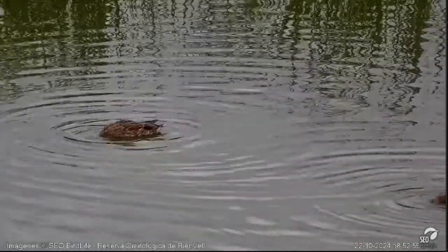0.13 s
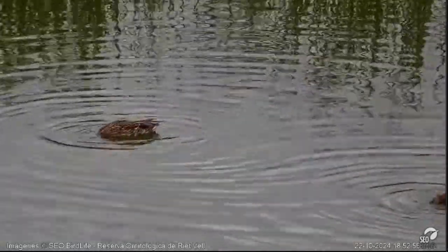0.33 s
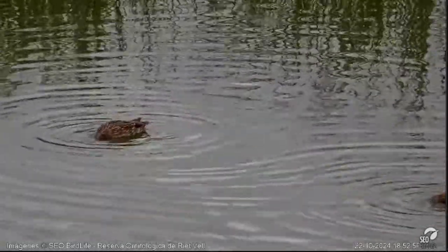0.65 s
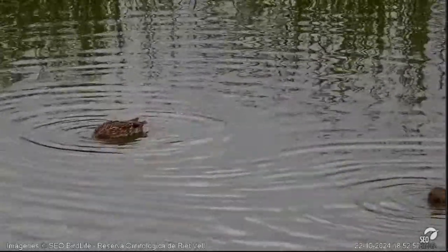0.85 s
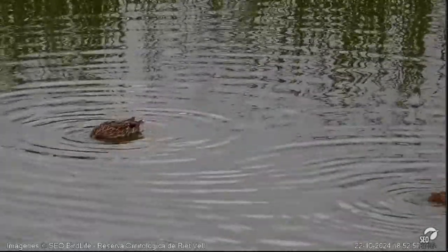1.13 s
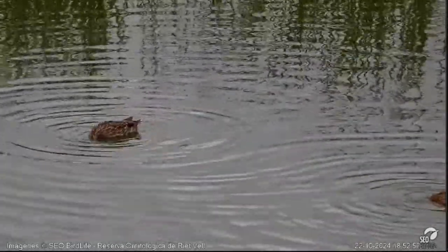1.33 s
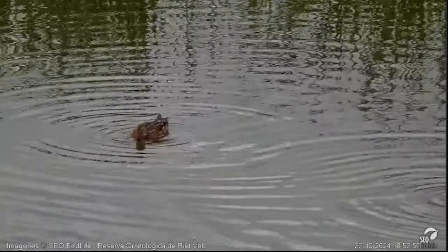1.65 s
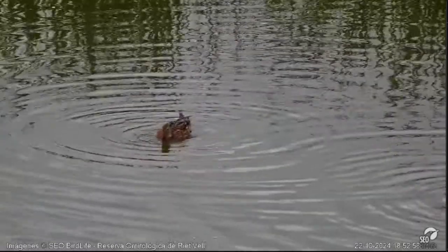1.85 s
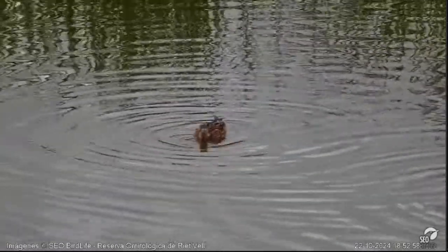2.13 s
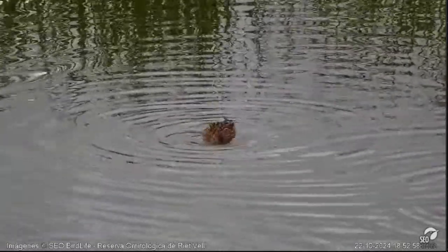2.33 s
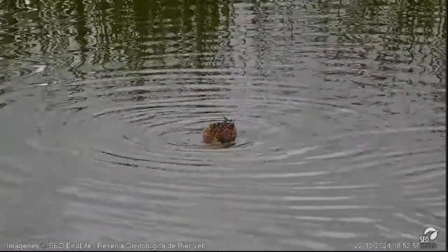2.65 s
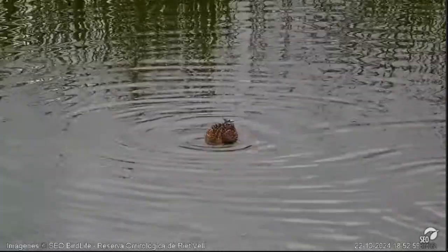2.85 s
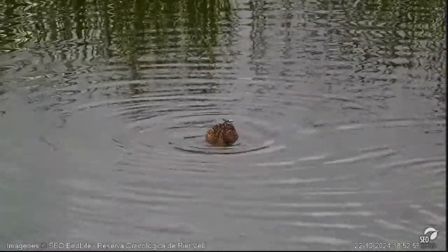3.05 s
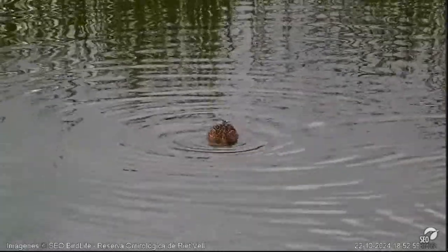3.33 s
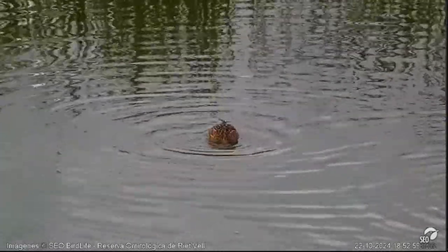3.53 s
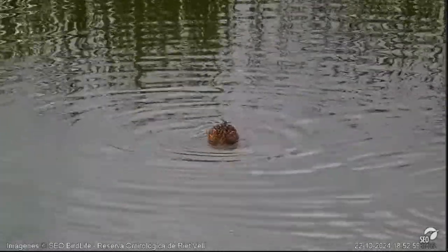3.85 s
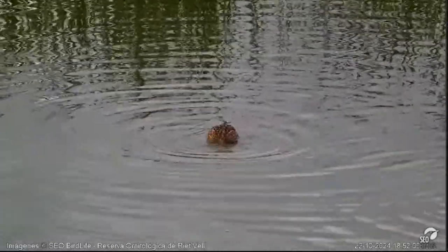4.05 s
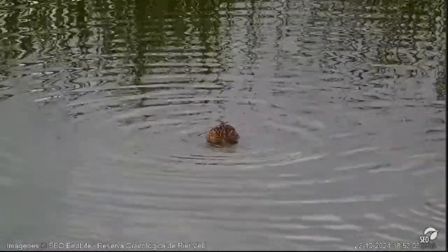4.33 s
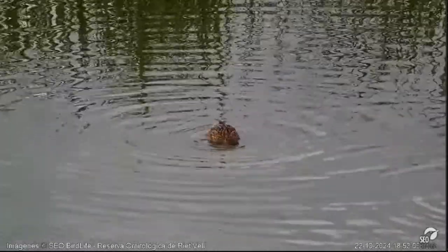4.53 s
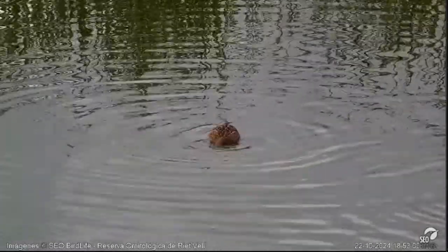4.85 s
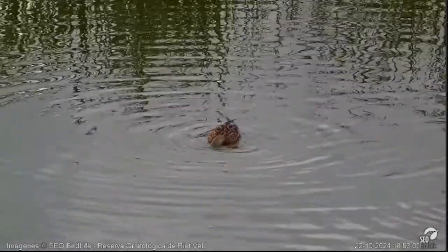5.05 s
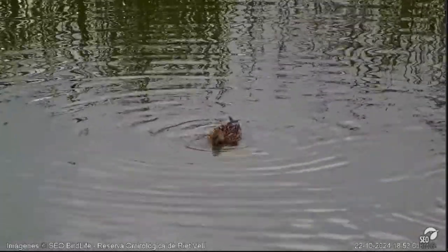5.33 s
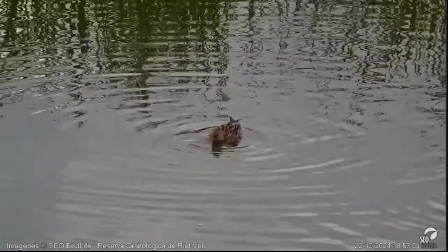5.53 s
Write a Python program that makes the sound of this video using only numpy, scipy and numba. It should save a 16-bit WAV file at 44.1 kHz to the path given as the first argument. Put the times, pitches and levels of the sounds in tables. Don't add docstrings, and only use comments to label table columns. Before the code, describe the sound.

Gusty lagoon ambience with thumping wind, throbbing insects, short bird whistles, distant duck cackles, a moment of silence, then a rough honk and grunt.

```python
import sys
import numpy as np
from scipy import signal
from scipy.fft import rfft, irfft
from scipy.io import wavfile
from scipy.ndimage import uniform_filter1d
from numba import njit

SR = 44100
rng = np.random.default_rng(int(sys.argv[2]) if len(sys.argv) > 2 else 0)


def transcribe(u):
    v = np.clip(np.atleast_2d(u).T, -1, 1)
    q = np.round(v * 32767).astype(np.int16)
    wavfile.write(sys.argv[1], SR, q)


def nominal_scale(level):
    x = np.asarray(level, float) / 20
    return 10 ** x


N = 251370
T = np.arange(N) / SR


def level(x, db):
    return x * nominal_scale(db) / np.sqrt(np.mean(x ** 2))


def track(tables):
    s, *columns = np.concatenate(tables).T
    return [np.interp(T, s, c) for c in columns]


@njit
def svf(x, hz, width):
    y, b, l = np.empty(len(x)), 0., 0.
    for i in range(len(x)):
        g, k = np.tan(np.pi * hz[i] / SR), width / hz[i]
        v = (b + g * (x[i] - l)) / (1 + g * (g + k))
        b, l, y[i] = 2 * v - b, l + 2 * g * v, k * v
    return y


def svf_twice(x, hz, width):
    return svf(svf(x, hz, width), hz, width)


def band(hz, width):
    centre = np.full(N, 1. * hz)
    return level(svf_twice(rng.standard_normal(N), centre, 1. * width), 0)


def walk(rate):
    k = int(SR / rate)
    steps = np.repeat(rng.standard_normal(N // k + 1), k)
    return 1.3 * uniform_filter1d(uniform_filter1d(steps, k), k)[:N]


def add(out, s, x):
    i = int(s * SR)
    out[max(i, 0):i + len(x)] += x[max(-i, 0):N - i]


def filtered(x, order, hz, kind="low"):
    return signal.sosfilt(signal.butter(order, hz, kind, fs=SR, output="sos"), x)


# time in seconds, level in dB.
GUST = [
    [(0.0, -41), (.3, -43), (0.6, -45), (1.15, -40), (1.45, -34.5), (1.7, -38.5), (2.0, -40.5),
     (2.35, -42.5), (2.55, -48)],
    [(2.88, -46.5), (3.07, -36.5), (3.31, -36), (3.55, -41.5), (4.04, -44.5), (4.4, -44.5), (4.9, -43.5),
     (5.42, -43.5), (5.7, -44)],
]


def wind():
    calm_db, calm_span_db, rumble_hz = -40, 9, 131.5
    gust_db = track(GUST)[0]
    eddies = filtered(rng.standard_normal(N), 3, 300.)
    out = eddies * nominal_scale(gust_db + 22.5 + 3.28 * walk(40))
    t = np.arange(-2000, 2000) / SR
    for (s, db, hz, length_s), turn in zip(buffets(), rng.random(N)):
        shape = np.exp(-(t / (0.67 * max(length_s, .003))) ** 2)
        shove = 1.6 * np.cos(2 * np.pi * turn)
        ring = np.sin(2 * np.pi * (hz * t + turn))
        add(out, s + t[0] - .004, nominal_scale(db) * shape * (ring + shove))
    rumble = filtered(out, 1, rumble_hz)
    return out - np.clip((calm_db - gust_db) / calm_span_db, 0, 1) * rumble


# time in seconds, peak in dB, ring in Hz, length in seconds.
BUFFETS = [(.008, -22.5, 236, 0.0047), (.403, -21, 232, 0.0025), (.6, -23, 287, 0.0067),
           (.707, -20.5, 210, 0.0074), (.747, -25, 242, 0.0077), (.984, -23.5, 223, 0.0051),
           (1.045, -20, 208, 0.0026), (1.236, -15, 243, 0.0056), (1.266, -9, 249.7, 0.012),
           (1.313, -15.5, 198, 0.0033), (1.343, -18, 200, 0.0084), (1.628, -24, 195, 0.0031),
           (1.832, -22, 214, 0.015), (2.143, -23, 204, 0.017), (2.172, -18, 222, 0.0041),
           (2.194, -19, 219, 0.012), (2.271, -20, 194, 0.0051), (3.13, -21.5, 226.3, 0.0037),
           (3.154, -13.5, 226, 0.004), (3.169, -18, 196, 0.0075), (3.214, -15.5, 216, 0.018),
           (3.266, -20, 228, 0.011), (3.305, -8, 164, 0.0051), (3.378, -13, 215, 0.0058),
           (3.398, -17.5, 228, 0.0056), (3.491, -22.5, 212, 0.024), (3.526, -16.5, 150, 0.0074),
           (4.623, -21.5, 242, 0.0089), (4.837, -21, 232, 0.0081), (5.13, -23.5, 205.8, 0.019)]
# time in seconds, peak in dB, ring in Hz.
PUFFS = [(0.063, -31, 303), (.363, -28.5, 277), (.767, -27, 273), (1.023, -29, 270), (1.2, -28, 250),
         (1.22, -24, 283), (1.381, -25, 190), (1.462, -34, 219), (1.494, -23, 217), (1.557, -26, 274),
         (1.811, -26, 208), (1.934, -24, 269), (1.965, -27.5, 260), (2.228, -27, 194), (2.316, -27, 217),
         (3.005, -29, 215), (3.076, -28, 332), (3.35, -22, 195), (3.427, -19, 208), (3.467, -13.5, 174),
         (3.511, -21.5, 215), (3.647, -23, 156), (3.827, -19.5, 206), (3.872, -24, 282),
         (3.913, -25.5, 286), (2.444, -27.5, 206), (2.49, -29, 192), (2.528, -28, 194.5), (1.759, -26, 171),
         (3.736, -28, 195), (4.168, -27, 201), (4.2, -30, 190), (4.221, -26.5, 247), (4.244, -30, 202),
         (4.279, -29.5, 237), (4.322, -27.5, 255), (4.371, -26, 303), (4.399, -29.5, 320),
         (4.815, -23.5, 317), (5.406, -25, 240), (4.899, -28, 211), (4.92, -28, 204), (5.06, -27, 207),
         (5.26, -33.5, 235), (5.3, -28, 243), (5.335, -32, 230), (5.43, -28, 232), (5.49, -30, 258)]


def buffets():
    puff_s, gap_s, over_gust_db, scatter_db = 0.0094, .045, 7.5, 2
    typical_hz, typical_s = 242, 0.01
    s = np.arange(0, T[-1], gap_s)
    late, size, pitch, length = rng.standard_normal((len(s), 4)).T
    s = np.clip(s + .4 * gap_s * late, 0, T[-1])
    db = np.interp(s, T, track(GUST)[0]) + over_gust_db + scatter_db * size
    chance = zip(s, db, typical_hz * (1 + .15 * pitch), typical_s * np.exp(0.69 * length))
    return BUFFETS + [(*row, puff_s) for row in PUFFS] + list(chance)


# frequency in Hz, level in dB per Hz.
SHORE = [(300, -7.5), (450, -5.5), (620, -21.5), (860, -11.5), (1400, -25.5), (1750, -18.5), (2100, -26),
         (2450, -27.5), (3200, -24), (4400, -28.5), (5600, -27.5), (7200, -39.5), (7800, -40)]
# time in seconds, level in dB.
SWELL = [
    [(0, 5), (1.0, 9.5), (1.6, 7), (2.5, 5.5), (3.4, 4.5), (3.6, 2), (4.0, 7.5), (4.6, 2), (5.7, 6)],
]


def shore():
    treble_share, treble_db = -0.7, 8
    out, (middle_db,) = 0, track(SWELL)
    hzs, dbs = np.transpose(SHORE)
    for hz in 330 * 2 ** np.arange(0, 4.6, 1 / 3):
        high = np.clip(np.log2(hz / 800) / 0.88, 0, 1)
        swell_db = (1 - high) * middle_db + high * (treble_db + treble_share * middle_db)
        db = np.interp(np.log(hz), np.log(hzs), dbs) + 10 * np.log10(hz) - 79.5
        flicker_db = (3 - high) * walk(18) + 2 * walk(45) + .8 * walk(4)
        out = out + nominal_scale(db + swell_db + flicker_db) * band(hz, .36 * hz)
    return out


# time in seconds, level in dB, throb depth 0-1.
INSECTS = [
    [(0, -57, 0.9), (.6, -59, 1), (1.2, -57, 0.9), (1.75, -52.5, 0.7), (1.95, -49.5, 0.7), (2.1, -67, 0.4),
     (2.5, -57, 0.7), (2.9, -61, 0.4), (3.5, -55, 0.44), (3.77, -57, 0.6), (3.83, -42.5, 0),
     (3.88, -56, .3), (4.4, -57.5, 0.65), (4.65, -50, 0.45), (5.0, -53.5, 0.5), (5.7, -58, 0.86)],
]


def insects():
    hiss_hz, width_hz, throb_hz = 5830., 400., 42.2
    db, depth = track(INSECTS)
    turn = (.13 + np.cumsum(throb_hz * (1 + 0.02 * walk(15))) / SR) % 1
    centre = hiss_hz * (1 + .12 * (.5 - turn) + .012 * walk(30))
    hiss = level(svf_twice(rng.standard_normal(N), centre, width_hz), -1.1)
    stroke = 1 - .85 * np.clip(depth, 0, 1) ** 1.5 * np.cos(2 * np.pi * turn)
    return nominal_scale(db + 1.5 * walk(30)) * hiss * stroke


# centre in Hz, width in Hz, strokes per second, level in dB.
STRAGGLERS = [
    (5426, 540, 16, -69),
    (6100, 270, 55, -68.5),
    (7360, 1020, 30, -69.5),
]


def stragglers():
    out = 0
    for hz, width_hz, rate_hz, db in STRAGGLERS:
        turns = np.cumsum(rate_hz * (1 + .06 * walk(8))) / SR
        stroke = 1 + 0.52 * np.sin(2 * np.pi * turns)
        out = out + nominal_scale(db + 1.5 * walk(10)) * band(hz, width_hz) * stroke
    return out


# multiple of the base pitch, rms level in dB.
WHINE = [
    (5, -70),
    (6, -68),
    (8, -72),
]


def whine():
    base_hz = 297
    return sum(nominal_scale(db + 3 + 2 * walk(10)) * np.sin(2 * np.pi * k * base_hz * T) for k, db in WHINE)


def whistle(hz, db, octave_db, unsteady):
    u = np.linspace(0, 1, len(hz))
    waver, flutter = uniform_filter1d(rng.standard_normal((2, len(hz))), size=130) * np.sqrt(130)
    phase = 2 * np.pi * np.cumsum(hz * (1 + 0.012 * unsteady * waver)) / SR
    tone = np.sin(phase) + nominal_scale(octave_db) * (np.sin(2 * phase) + nominal_scale(-23.5) * np.sin(3 * phase))
    return nominal_scale(db + 3) * (1 + unsteady * flutter) * np.sin(np.pi * u) ** .45 * tone


# start in seconds, length in seconds, first Hz, last Hz, level in dB.
PIPES = [(0.0, 0.023, 3330, 3380, -38), (.086, 0.013, 3030, 2950, -48), (.093, 0.016, 2910, 2820, -36),
         (.398, .018, 4200, 4400, -61), (.421, .016, 4180, 4300, -52), (.441, 0.015, 4130, 4300, -46),
         (.462, 0.016, 4160, 4350, -40.5), (.463, 0.016, 3500, 3640, -50.5),
         (.519, 0.0082, 3800, 3650, -39), (.506, 0.04, 3800, 3980, -44.5), (.47, .03, 2330, 2450, -52.5),
         (.575, 0.019, 2130, 2220, -38), (.572, 0.0072, 4250, 4380, -42), (.575, 0.016, 3900, 3620, -52),
         (.591, .02, 2810, 2790, -45), (.61, 0.041, 2790, 2820, -53.5), (.656, 0.067, 2860, 2810, -61),
         (.758, 0.056, 2490, 2350, -68), (1.203, 0.019, 1760, 1530, -39.5), (1.921, 0.023, 1520, 1690, -43)]
# start and length in seconds, first and last Hz, level in dB.
CHIRP = [
    (.491, 0.01, 1960, 1920, -39),
    (.511, 0.018, 2043, 2110, -38),
    (.535, 0.024, 2230, 2223, -30.5),
    (.555, 0.023, 2208, 2090, -29.5),
]
# start in seconds, level in dB.
TRILL = [(1.18, -48), (1.242, -37.5), (1.304, -37), (1.381, -37.5), (1.446, -39.5), (1.516, -43.5),
         (1.579, -42), (1.649, -41.5), (1.718, -43), (1.787, -42.5), (1.853, -40)]


def songbirds():
    low_hz, top_hz, trill_note_s = 1509, 1728, .055
    out = np.zeros(N)
    for notes, octave_db, unsteady in [(PIPES, -28, .22), (CHIRP, -3, .36)]:
        for s, length_s, first_hz, last_hz, db in notes:
            hz = np.linspace(first_hz, last_hz, int(length_s * SR))
            add(out, s, whistle(hz, db, octave_db, unsteady))
    arch = np.sin(np.linspace(0, np.pi, int(trill_note_s * SR))) ** 0.77
    dip = 1 - .6 * arch ** 12
    for s, db in TRILL:
        add(out, s, whistle(low_hz + (top_hz - low_hz) * arch, db, -45, .48) * dip)
    return out


def near_reflections(voice):
    smear = rng.standard_normal(900) * np.exp(-np.arange(900) / (0.0076 * SR))
    colour = rfft(smear, 4096)
    smear = np.roll(irfft(colour / np.abs(colour)), 400)[:1600]
    return signal.fftconvolve(voice, smear)[400:400 + len(voice)]


def waterfowl(calls, throat):
    out = np.zeros(N)
    for points in calls:
        s, *columns = np.transpose(points)
        t = np.arange(s[0], s[-1], 1 / SR)
        db, throat_hz, hz, rough = (np.interp(t, s, c) for c in columns)
        rough = np.clip(rough, 0, 1)
        chance = rng.standard_normal((3, len(t)))
        wobble = uniform_filter1d(chance[0], size=300) * np.sqrt(300)
        cycles = np.cumsum(hz * (1 + .12 * rough * wobble)) / SR
        pulses = np.diff(np.floor(cycles), prepend=0) * nominal_scale(7 * rough * chance[1]) * np.sqrt(SR / hz)
        air = chance[2] * 1.5 * np.exp(-(cycles % 1) / 0.7)
        source = (1 - rough) * pulses + rough * air
        wider = .75 + .7 * rough.mean()
        voice = sum((-1) ** k * nominal_scale(d) * svf_twice(source, share * throat_hz, width_hz * wider)
                    for k, (share, width_hz, d) in enumerate(throat))
        voice = level(near_reflections(voice), 0)
        add(out, s[0] - .002, voice * nominal_scale(db) * signal.windows.tukey(len(t), .12))
    return out


def call(times, db, throat_hz, hz, rough):
    rise_db, fall_db = -6.5, -7.5
    ends = [times[0], times[-1]]
    dbs = db + np.array([rise_db, 0, fall_db])
    throats, pitches = np.interp(times, ends, throat_hz), np.interp(times, ends, hz)
    return list(zip(times, dbs, throats, pitches, np.full(len(times), rough)))


RASP_HZ, RASP_ROUGH = 250, .55

# start in seconds, end in seconds, peak in dB, first Hz, last Hz.
CACKLES = [
    (0.849, 0.993, -40, 540, 631),
    (0.89, 1.043, -41.5, 635, 470),
    (0.854, 0.896, -40, 380, 776),
    (1.054, 1.105, -40, 640, 750),
    (1.057, 1.127, -45, 578, 538),
    (4.208, 4.24, -36.5, 435, 460),
    (4.178, 4.21, -34.5, 240, 250),
]
# start in seconds, end in seconds, peak in dB, first Hz, last Hz.
GABBLE = [
    (0.035, 0.127, -45.5, 332, 327),
    (0.131, 0.202, -42, 419, 419),
    (0.201, 0.25, -39, 434, 442),
    (0.24, 0.274, -33, 425.4, 434),
    (0.277, 0.341, -48.5, 409, 400),
    (4.14, 4.187, -41.5, 426.5, 432),
    (4.897, 4.95, -49.5, 472, 466),
    (4.954, 5.076, -44, 475, 444),
    (5.061, 5.271, -47, 503, 456),
]
# start, loudest and end in seconds, peak in dB, throat in Hz.
RASPS = [(.588, .64, .76, -45, 2800), (.6, .757, .97, -46, 893), (.05, .2, .34, -48, 1450),
         (.86, .95, 1.13, -50, 1450), (1.308, 1.325, 1.345, -47, 850), (1.41, 1.43, 1.46, -48, 930),
         (1.494, 1.51, 1.67, -47, 700), (0, .02, .21, -50, 540), (2.42, 2.45, 2.55, -47, 650),
         (2.44, 2.48, 2.55, -49, 1000), (2.895, 2.91, 2.93, -51, 1600), (2.955, 2.985, 3.025, -41, 950),
         (3.035, 3.058, 3.075, -43, 930), (3.158, 3.168, 3.235, -46, 1400), (3.14, 3.164, 3.24, -45, 720),
         (3.265, 3.294, 3.32, -47, 1000), (3.33, 3.363, 3.42, -48, 700), (3.35, 3.365, 3.38, -51, 1750),
         (3.57, 3.598, 3.63, -46, 846), (3.565, 3.6, 3.625, -51, 1700), (3.682, 3.69, 3.76, -43, 1010),
         (3.681, 3.695, 3.74, -43, 680), (3.7, 3.735, 3.76, -49, 1750), (4.075, 4.113, 4.125, -39, 530),
         (4.24, 4.26, 4.3, -47, 500), (4.02, 4.035, 4.05, -45, 520), (4.5, 4.53, 4.58, -56, 2200),
         (4.85, 4.88, 4.96, -46, 880), (5.012, 5.03, 5.05, -37, 550), (5.05, 5.12, 5.25, -43, 560),
         (5.06, 5.12, 5.24, -48, 950), (5.062, 5.072, 5.085, -48, 2000), (5.092, 5.102, 5.112, -44, 1780),
         (5.59, 5.603, 5.62, -54, 2150), (5.315, 5.33, 5.345, -46, 780), (5.17, 5.2, 5.25, -48, 1300),
         (4.4, 4.45, 4.5, -50, 520), (4.7, 4.77, 4.82, -45, 450)]
# share of throat Hz, width in Hz, level in dB.
FLOCK_THROAT = [
    (.5, 220, -7),
    (1.0, 330, 4),
    (1.35, 398, -13),
]


def flock():
    gabble_throat_hz, cackle_rough, gabble_rough, peak_share, rasp_sag = 1267, 0.45, .38, .37, .03
    calls = []
    for a, b, db, *hz in CACKLES:
        calls.append(call([a, a + peak_share * (b - a), b], db, [2 * f for f in hz], hz, cackle_rough))
    for a, b, db, *hz in GABBLE:
        calls.append(call([a, a + peak_share * (b - a), b], db, [gabble_throat_hz] * 2, hz, gabble_rough))
    for *s, db, hz in RASPS:
        sag = [hz * (1 + rasp_sag), hz * (1 - rasp_sag)]
        calls.append(call(s, db, sag, [RASP_HZ] * 2, RASP_ROUGH))
    return waterfowl(calls, FLOCK_THROAT)


# start in seconds, end in seconds, peak in dB, first Hz, last Hz.
SQUEALS = [(3.49, 3.61, -55, 4700, 4000), (3.5, 3.6, -57, 5400, 5000), (4.0, 4.1, -56, 1900, 1700),
           (.64, .76, -53, 2950, 2750), (.48, .59, -48, 3600, 3900), (.58, .72, -58, 4300, 4200),
           (3.77, 3.83, -54, 3100, 2800), (.6, .81, -53, 2850, 2600), (.53, .6, -54, 2900, 2600),
           (1.2, 2.0, -53, 1650, 1650), (.5, .585, -46, 4000, 4000)]
# share of throat Hz, width in Hz, level in dB.
SQUEAL_THROAT = [
    (1, 900, 0),
]


def squeals():
    calls = [call([a, (2 * a + b) / 3, b], db, hz, [RASP_HZ] * 2, 1) for a, b, db, *hz in SQUEALS]
    return waterfowl(calls, SQUEAL_THROAT)


# start, loudest and end in seconds, peak in dB, throat in Hz.
CLUCKS = [
    (1.178, 1.187, 1.2, -44, 900),
    (1.202, 1.21, 1.222, -35, 920),
    (1.222, 1.228, 1.237, -41, 890),
    (1.25, 1.259, 1.28, -40, 920),
]
# share of throat Hz, width in Hz, level in dB.
CLUCK_THROAT = [
    (1, 230, 0),
    (.68, 200, -12),
]


def clucks():
    calls = [call(s, db, [hz] * 2, [RASP_HZ] * 2, RASP_ROUGH) for *s, db, hz in CLUCKS]
    return waterfowl(calls, CLUCK_THROAT)


# first Hz, last Hz, roughness 0-1.
HONK = [
    (160, 141, .44),
    (301, 294, .36),
    (137, 128, .32),
    (299, 297, .08),
    (300, 297, .32),
]
# time in seconds, level in dB.
HONK_EFFORT = [
    [(3.772, -46), (3.785, -42), (3.803, -33), (3.812, -22.5), (3.829, -25), (3.834, -33), (3.852, -29)],
    [(3.84, -28), (3.86, -31), (3.875, -36), (3.89, -29), (3.905, -32), (3.918, -30), (3.924, -37.5),
     (3.935, -35)],
    [(3.926, -41), (3.936, -32), (3.944, -28.5), (3.966, -29.5), (3.972, -35), (3.997, -40), (4.003, -45),
     (4.03, -54)],
    [(3.85, -49), (3.865, -37), (3.9, -37.5), (3.915, -48)],
    [(3.762, -46), (3.769, -37), (3.782, -41), (3.8, -31.5), (3.81, -41)],
]
# share of throat Hz, width in Hz, level in dB.
HONK_THROAT = [
    [(.46, 220, -11.5), (.82, 300, 0.5), (1.03, 260, 1), (1.4, 275, 1), (1.88, 258, -14)],
    [(.46, 200, -4), (.7, 220, -4.5), (.93, 260, 0), (1.17, 260, -9), (1.55, 400, -8.5)],
    [(.46, 220, -24), (.83, 170, 0.5), (1.04, 220, 2.5), (1.5, 480, -7), (1.9, 297, -16.5)],
    [(1.39, 140, -2), (1.86, 140, -13)],
    [(1.3, 260, 0), (1.78, 260, -15)],
]


def honk():
    rest_hz, close_share, close_s = 1268, 0.072, 0.022
    out = 0
    for effort, (first_hz, last_hz, rough), throat in zip(HONK_EFFORT, HONK, HONK_THROAT):
        s, db = np.transpose(effort)
        u = np.arange(s[0], s[-1], .002)
        throat_hz = rest_hz * (1 + close_share * np.exp((HONK_EFFORT[0][0][0] - u) / close_s))
        hz = np.linspace(first_hz, last_hz, len(u))
        points = np.transpose([u, np.interp(u, s, db), throat_hz, hz, np.full(len(u), rough)])
        out = out + waterfowl([points], throat)
    return out


# time in seconds, level in dB, pitch in Hz.
GRUNT = [(4.095, -44.5, 182.7), (4.104, -33.5, 188.3), (4.112, -29, 188.5), (4.142, -31, 203.9),
         (4.153, -41, 210.8), (4.161, -35.5, 213.1), (4.188, -34.5, 191.7), (4.208, -34, 204),
         (4.222, -34.5, 215.8), (4.24, -41.5, 202), (4.291, -43, 202)]
# share of throat Hz, width in Hz, level in dB.
GRUNT_THROAT = [
    (.5, 120, -16),
    (1.0, 200, 0),
    (1.36, 160, -9),
    (2.0, 264, -16),
    (3.05, 300, -16),
    (4.6, 500, -27),
]


def grunt():
    rest_hz, close_hz, close_s, rough, rough_per_db = 415, 109, 0.0075, .1, .03
    top_db = max(db for _, db, _ in GRUNT)
    points = []
    for s, db, hz in GRUNT:
        throat_hz = rest_hz + close_hz * np.exp((GRUNT[0][0] - s) / close_s)
        points.append((s, db, throat_hz, hz, rough + rough_per_db * (top_db - db)))
    return waterfowl([points], GRUNT_THROAT)


def scene():
    echo_db, echo_t60_s, song_dry_share = -10, .13, .2
    song = songbirds()
    birds = song + flock() + squeals() + clucks() + honk() + grunt()
    t = T[:12000]
    scatter = rng.standard_normal(len(t)) * 1000. ** (-t / echo_t60_s)
    scatter = scatter / np.sqrt(np.sum(scatter ** 2))
    echo = signal.fftconvolve(birds - song_dry_share * song, scatter)[:N]
    return (birds + nominal_scale(echo_db) * echo + wind() + shore() + insects() + stragglers())[None]


def gate(gaps):
    return 1 - sum(np.clip(np.minimum(T - a, b - T) / 0.0028 + .5, 0, 1) for a, b in gaps)


# start in seconds, end in seconds.
LOST = [
    (1.236, 1.250),
    (1.288, 1.307),
    (1.387, 1.402),
    (3.093, 3.120),
    (3.236, 3.242),
    (3.422, 3.439),
    (3.460, 3.474),
]


def lose_packets(x):
    return x * gate(LOST)


# start in seconds, end in seconds.
SILENCE = [
    (2.552, 2.872),
]


def fall_silent(x):
    return x * gate(SILENCE)


def roll_off(x):
    return signal.sosfilt(signal.butter(12, 15500, fs=SR, output="sos"), x)


def record(dry):
    wind_cut_hz, leak_db, link_top_hz, hiss_db = 146.7, -21.5, 8080, -71.5
    x = lose_packets(dry + whine())
    x = filtered(x, 5, wind_cut_hz, "high") + nominal_scale(leak_db) * filtered(x, 2, 55, "high")
    x = signal.sosfilt(signal.cheby1(8, .5, link_top_hz, fs=SR, output="sos"), x)
    x = fall_silent(x + nominal_scale(hiss_db) * rng.standard_normal(x.shape))
    return roll_off(x)


dry = scene()
out = record(dry)
transcribe(out)
```